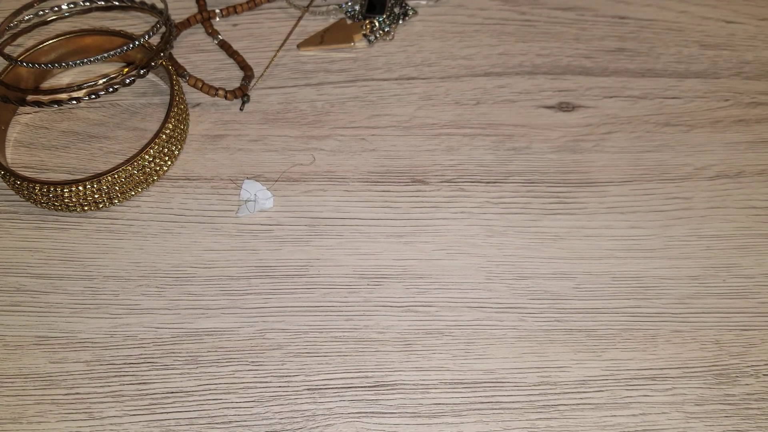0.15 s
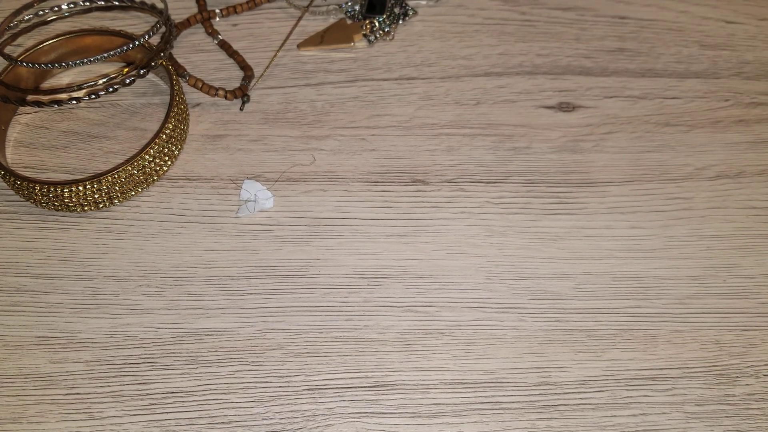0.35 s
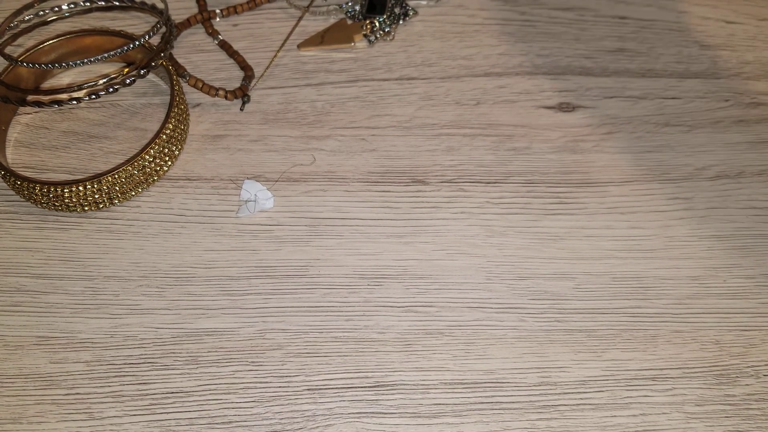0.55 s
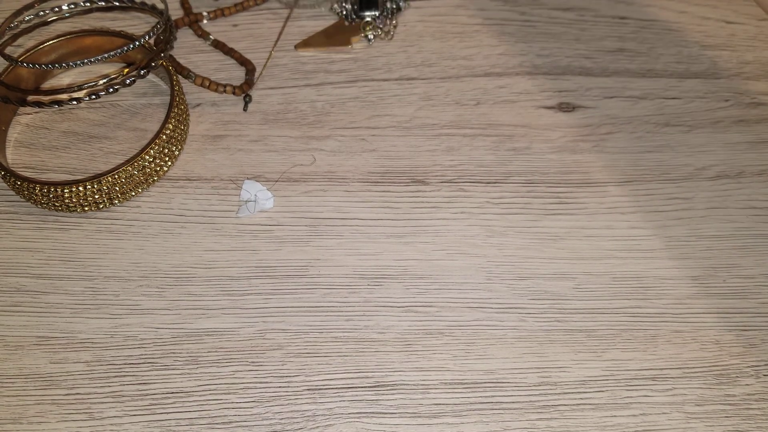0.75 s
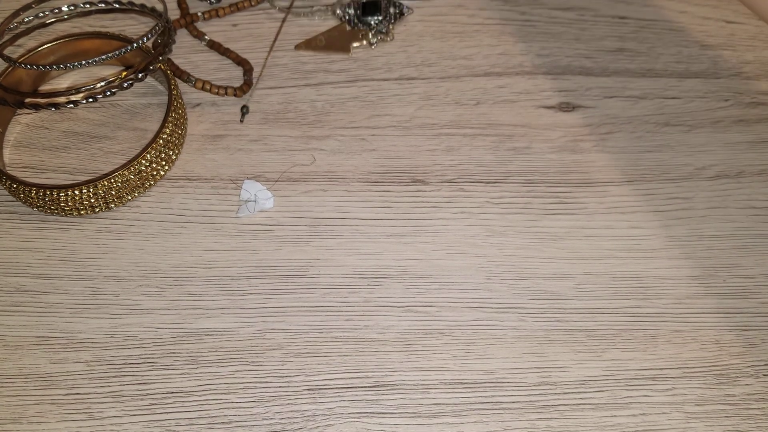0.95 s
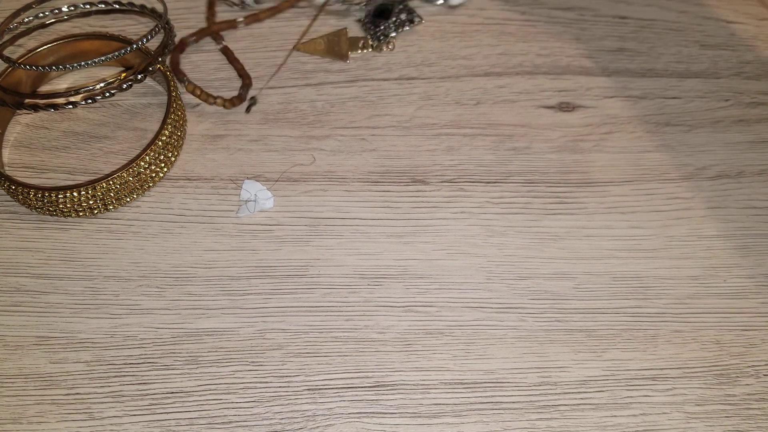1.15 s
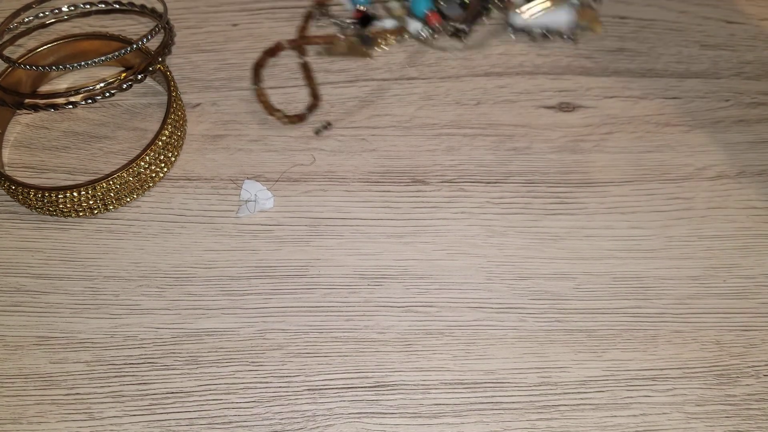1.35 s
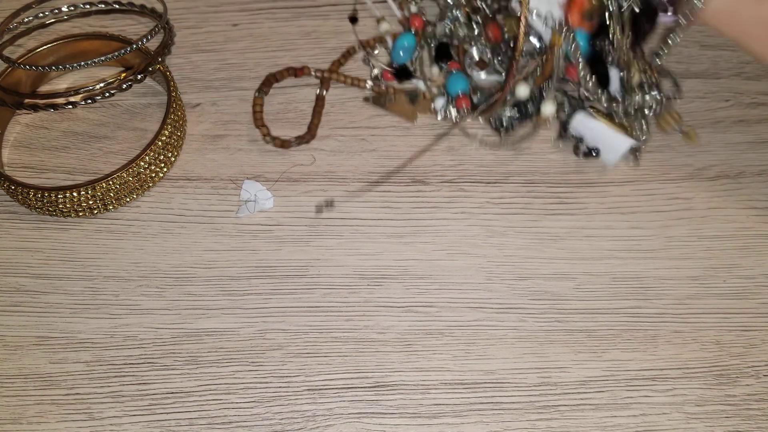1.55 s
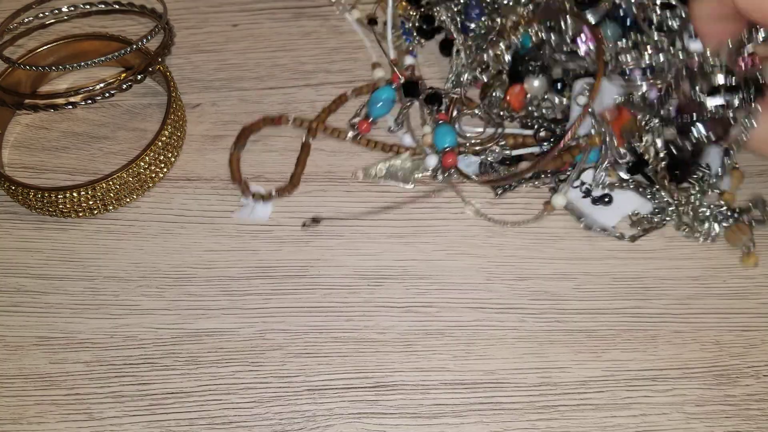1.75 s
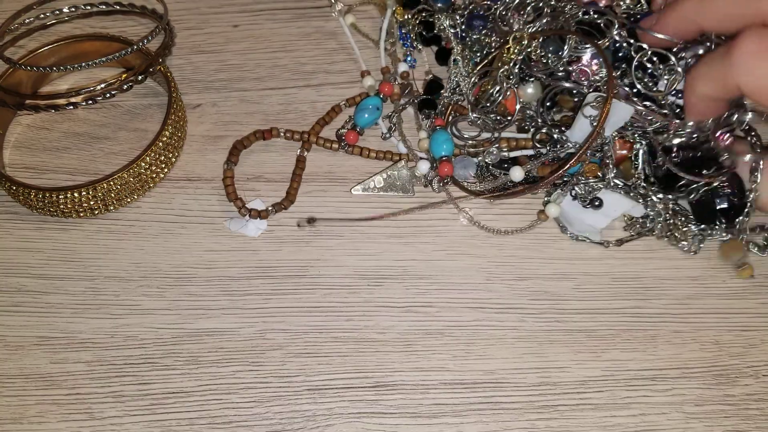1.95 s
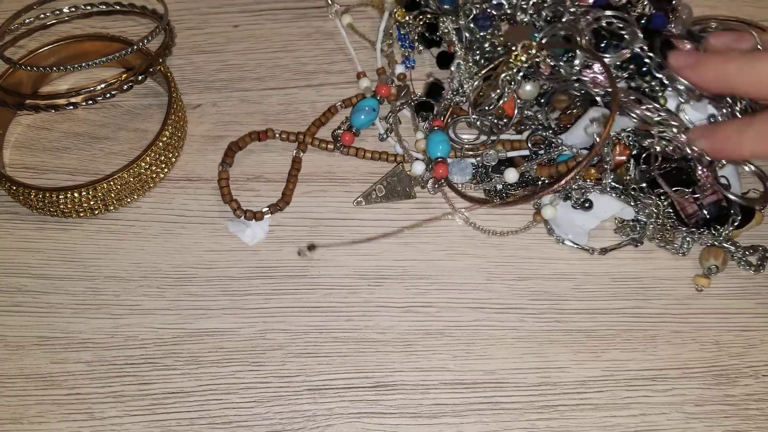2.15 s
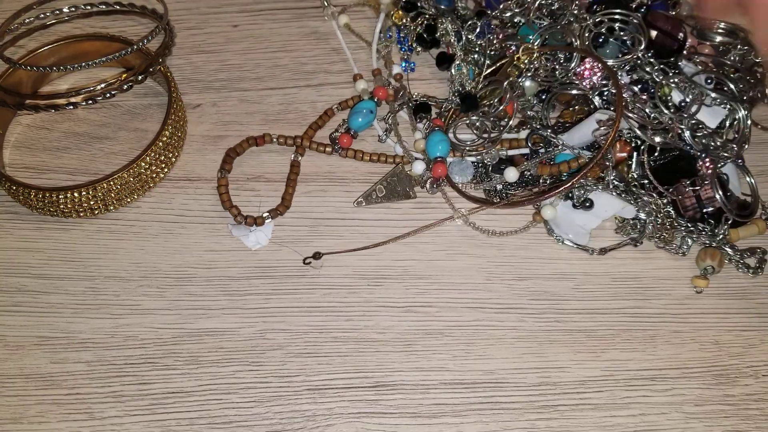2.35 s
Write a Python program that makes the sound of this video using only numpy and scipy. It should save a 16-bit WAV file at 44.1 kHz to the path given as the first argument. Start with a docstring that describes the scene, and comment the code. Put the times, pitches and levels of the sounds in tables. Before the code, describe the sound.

A tangled heap of jewelry rustles and clinks as it is pushed across a wooden table. Beads clack and chains tick, growing louder over soft bumps, then settle, close up in a small room.

```python
"""Clacking beads and ticking chain links: a tangled heap of costume jewellery is pushed across a wooden
table and let go, close up in a small room. The rustle is a swarm of tiny random contacts, thicker and
louder the harder the push, with single pieces knocking out above it. A bangle clinks and a small charm
rings briefly. Underneath, the tabletop patters, rumbles and bumps, over a faint hiss and low hum."""
import sys
import numpy as np
from scipy import signal
from scipy.fft import rfft, irfft
from scipy.io import wavfile
from scipy.ndimage import uniform_filter1d

SR = 44100
rng = np.random.default_rng(int(sys.argv[2]) if len(sys.argv) > 2 else 0)


def digitize_waveform(pressure):
    """Quantize a signal to 16-bit integers and store it at the path in sys.argv[1].

    Rows of a 2-D input are taken as channels; values are limited to [-1, 1].
    """
    field = np.atleast_2d(pressure).T
    bounded = np.clip(field, -1, 1)
    quanta = np.round(bounded * 32767).astype(np.int16)
    wavfile.write(sys.argv[1], SR, quanta)


N = 110250
TIME = np.arange(N) / SR
BUSY_DB = -38  # the level at which contacts come at their nominal rate
WOOD_DECAY_S = 0.00063
WOOD_ALIKE, BEAD_ALIKE, LINK_ALIKE = 0.92, 0.36, 0.032  # left-right likeness: 0 wide, 1 mono
WOOD_PAN_DB, BEAD_PAN_DB = [[-0.83], [0.83]], [[-0.5], [0.5]]  # left, right

# single pieces knocking: start_s, length_s, tabletop_db, clack_db, click_db, tick_db, tick_pitch_hz
KNOCKS = [(0.6128, 0.001, -61, -53, -50, -42.5, 12700), (0.6342, 0.0037, -44, -30.5, -39, -42.5, 12000),
          (0.669, .0027, -59, -53, -40, -40, 5200), (0.885, .0024, -55, -40.5, -51, -35, 12400),
          (0.9358, 0.0044, -40.5, -39, -33.5, -36, 13000), (0.978, 0.0012, -41, -50, -54, -27, 13000),
          (0.989, 0.0045, -32, -41, -55, -42, 12600), (1.047, .0035, -47, -35.5, -30, -36, 5030),
          (1.065, 0.0034, -48, -36, -32, -39, 12700), (1.226, .0014, -39, -41, -35, -25.5, 12600),
          (1.3044, 0.0013, -48, -40, -42, -24.5, 15000), (1.361, .0034, -47, -31.5, -30, -28, 14000),
          (1.4502, 0.002, -25, -24, -32, -21.5, 11300), (1.576, 0.0033, -28, -24, -24, -24, 12400),
          (1.6668, 0.0033, -27, -21, -31.5, -35, 3900), (1.676, 0.0044, -30, -28.5, -44, -41, 2400),
          (1.6932, 0.0025, -32, -27, -27.5, -24, 3700), (1.837, .002, -56, -48, -37.5, -35.5, 12000),
          (1.96, 0.003, -43.5, -36.5, -38, -38, 14000), (1.965, .003, -44, -41, -40, -34.5, 13400),
          (2.0138, 0.0071, -47, -43.5, -42, -38, 13900), (2.0712, 0.0019, -43, -42.5, -54, -41, 3800),
          (2.0857, 0.0022, -35, -43, -36.5, -38, 12500), (2.097, 0.0019, -51, -52, -44, -33.5, 13000),
          (2.1457, 0.0028, -43.5, -44.5, -45, -37, 7340), (2.158, 0.0022, -50.5, -40.5, -47.5, -43, 7800),
          (2.1838, .0018, -52, -60, -46, -36, 15400), (2.187, .0026, -46, -41, -41, -45, 13000),
          (2.1984, 0.003, -57, -39, -43, -43, 15400), (2.244, 0.0029, -43.5, -46, -47.5, -39, 14600),
          (2.354, 0.004, -70, -63, -44.5, -46.5, 11900), (2.488, 0.0053, -55, -61, -57, -46.5, 12600)]


def push_levels():
    """The push swells and settles: level curves in dB for patter, beads and links."""
    push = [(0.613, -63, -59.5, -81), (0.628, -43.5, -42, -51), (0.69, -48.5, -38.5, -46),
            (0.75, -38.5, -33, -39), (0.821, -58.5, -48, -45), (0.909, -59.5, -47.5, -46.5),
            (0.959, -44, -39, -44), (1.02, -46, -37, -38), (1.06, -40.5, -34, -33.5),
            (1.11, -44, -35.5, -41), (1.21, -42, -33.5, -33.5), (1.32, -42, -34, -35.5),
            (1.38, -32, -28.5, -33), (1.46, -30.5, -25, -31.5), (1.53, -34.5, -28, -32.5),
            (1.61, -29.5, -29, -34.5), (1.68, -31, -30.5, -34.5), (1.761, -35, -32, -34.5),
            (1.8, -46, -41, -45), (1.89, -48.5, -43.5, -42.5), (1.96, -48, -42.5, -40.5),
            (2.02, -49.5, -42.5, -42), (2.06, -53.5, -45.5, -48.5), (2.135, -62.5, -53.5, -56.5),
            (2.16, -47.5, -48, -50.5), (2.26, -55.5, -50, -44.5), (2.33, -61, -54.5, -48),
            (2.381, -64, -59, -59), (2.43, -81, -77, -68)]  # the gesture: time_s, patter_db, beads_db, links_db
    times, *layers = np.transpose(push)
    return [np.interp(TIME, times, db, left=-120) for db in layers]


def beads(level_db):
    """Beads and pendants clack against each other: a dense rustle with single hits on top."""
    rustle_tone = [(300, -15), (900, -5.5), (1500, 0), (2200, 1.5), (2900, 4.5), (3450, -4), (4050, 2),
                   (4700, 1.5), (5300, 3), (6500, -2), (8000, -1), (9200, -8), (12000, -3), (16000, -43)]  # spectrum of the massed beads: frequency_hz, level_db
    clack_tone = [(300, -8), (680, 0), (1050, 5), (1400, -2), (2000, 4), (3000, -0.5), (4200, 2),
                  (5000, -15.5), (8000, -27), (16000, -45)]  # midrange body of one hit: frequency_hz, level_db
    click_tone = [(1500, -28), (3500, -22), (5000, 5.5), (6500, -1), (8000, 2), (9200, -3.5), (12000, -22),
                  (16000, -35)]  # hard edge of one hit: frequency_hz, level_db
    swarm = contacts(level_db, per_s=1500, spread_db=-1, decay_s=0.0018, alike=BEAD_ALIKE)
    rustle = from_db(-2.5) * colour(swarm, rustle_tone)
    clacks = colour(knocks("clack", BEAD_ALIKE, decay_share=1.6), clack_tone)
    clicks = colour(knocks("click", LINK_ALIKE, decay_share=1.0), click_tone)
    return (rustle + clacks + clicks) * from_db(BEAD_PAN_DB)


def chains(level_db):
    """Fine links tick as the chains slide."""
    link_tone = [(2000, -32.5), (6000, -8), (9300, -10.5), (11200, -5.5), (12600, 0.5), (14200, -3.5),
                 (15400, -2), (17000, -11)]  # bright spectrum of the links: frequency_hz, level_db
    swarm = contacts(level_db, per_s=1500, spread_db=0.5, decay_s=0.00081, alike=LINK_ALIKE)
    return from_db(-2) * colour(swarm, link_tone)


def tinkles(level_db, per_s=380, low_hz=1509, high_hz=7985, t60_s=0.046):
    """Small metal parts ring for a moment, each at its own pitch, louder as the heap moves harder."""
    out, t = np.zeros((2, N)), TIME[:4096]
    decay = np.exp(-np.log(1000) * t / t60_s)
    for when, pitch, size, *phases in rng.random((int(per_s * N / SR), 5)):
        hz = low_hz * (high_hz / low_hz) ** pitch
        strength = from_db(level_db[int(when * N)] - 13 + 13 * (size - 0.5))
        tone = np.sin(2 * np.pi * (hz * t + np.array(phases)[:, None]))
        add(out, when * N / SR, strength * decay * tone)
    return out


def bright_ticks(width_hz=2000):
    """Each piece that knocks gives a bright tick around a pitch of its own."""
    out = np.zeros((2, N))
    for start_s, length_s, *_, db, hz in KNOCKS:
        resonance = signal.iirpeak(hz, hz / width_hz, fs=SR)
        tick = signal.lfilter(*resonance, burst(length_s, LINK_ALIKE))
        add(out, start_s, from_db(db) * np.sqrt(length_s * SR) * energy_one(tick))
    return out


def bangle():
    """A struck bangle clinks with a few short, inharmonic modes."""
    hits = [(.6365, -35.5), (.9365, -39), (1.049, -40), (2.3545, -55.5)]  # strikes on the bangle: start_s, level_db
    modes = [(670, -1, 0.074), (1050, -10, .05), (2850, 3.5, 0.072), (3116, 4.5, 0.053), (3530, -15, 0.078),
             (4150, -1, 0.066), (4255, -2, 0.042), (5148, -22, 0.052)]  # its resonances: pitch_hz, level_db, t60_s
    return metal(hits, modes)


def charm():
    """A tiny charm rings very high; its close modes beat into a shimmer."""
    hits = [(.9935, -32), (1.14, -38), (1.226, -41), (1.272, -38), (1.33, -37), (1.40, -43), (1.46, -33),
            (1.56, -35)]  # strikes on the charm: start_s, level_db
    modes = [(12340, -7, .14), (12505, -1.5, .15), (12645, -1.5, .15)]  # its resonances: pitch_hz, level_db, t60_s
    return metal(hits, modes)


def metal(hits, modes):
    """A metal piece rings; each hit reaches each mode and side with its own strength and phase."""
    out, t = np.zeros((2, N)), TIME[:SR // 4]
    hz, mode_db, t60_s = np.transpose(modes)[:, :, None]
    decay = np.exp(-np.log(1000) * t / t60_s)
    for start_s, db in hits:
        strength = from_db(db + mode_db + 2 * rng.standard_normal((2, len(modes), 1)))
        phase = rng.uniform(0, 2 * np.pi, strength.shape)
        add(out, start_s, np.sum(strength * decay * np.sin(2 * np.pi * hz * t + phase), axis=1))
    return out


def contacts(level_db, per_s, spread_db, decay_s, alike, pieces=14):
    """Random contacts dealt to many pieces; the higher the level, the denser and louder they come."""
    rate_per_s = per_s * from_db(0.6 * (level_db - BUSY_DB))
    struck = rng.random(N) < rate_per_s / SR
    sizes = from_db(spread_db * np.minimum(rng.exponential(1, N), 4))
    clicks = struck * sizes * rng.choice([-1, 1], N)
    local_rms = np.sqrt(np.abs(uniform_filter1d(clicks ** 2, size=1300)) + 1e-4)
    clicks = clicks / local_rms * from_db(level_db)
    owner = rng.integers(0, pieces, N)
    return sum(signal.oaconvolve((clicks * (owner == k))[None], burst(decay_s, alike), axes=1)[:, :N]
               for k in range(pieces))


def knocks(layer, alike, decay_share):
    """One layer of the single knocks: sharp bursts that die within milliseconds."""
    out = np.zeros((2, N))
    column = ("tabletop", "clack", "click").index(layer)
    for start_s, length_s, *levels_db in KNOCKS:
        strength = from_db(levels_db[column]) * np.sqrt(length_s * SR)
        add(out, start_s, strength * burst(length_s * decay_share, alike))
    return out


def tabletop(level_db):
    """The sliding heap drums evenly on the board; single knocks stand out above it."""
    patter = board(contacts(BUSY_DB, per_s=600, spread_db=2, decay_s=WOOD_DECAY_S, alike=WOOD_ALIKE))
    local_rms = np.sqrt(uniform_filter1d(np.mean(patter ** 2, axis=0), size=1100) + 1e-9)
    hits = board(knocks("tabletop", WOOD_ALIKE, decay_share=0.56))
    return (from_db(level_db) * patter / local_rms + hits) * from_db(WOOD_PAN_DB)


def board(force):
    """The board answers with a dull knock and its own modes."""
    wood_tone = [(40, -12), (100, -12), (200, -4.5), (290, 6), (400, 5.5), (520, 6.5), (720, -1.5),
                 (950, -7), (1400, -13), (2500, -19.5), (6000, -45.5)]  # spectrum of the dull knock: frequency_hz, level_db
    modes = [(281, -3, 0.19), (350, -2.5, .05), (410.2, 6.5, 0.061), (546.4, 8, 0.14), (614, -0.5, 0.14),
             (720.3, 12.5, 0.07), (802, 1, 0.046), (967, -4, 0.091), (1088, -6, 0.048)]  # tabletop resonances: pitch_hz, level_db, t60_s
    ringing = sum((-1) ** k * from_db(db) * ring(force, hz, t60_s)
                  for k, (hz, db, t60_s) in enumerate(modes))
    return colour(force, wood_tone) + from_db(-3.5) * rms_one(ringing) * force.std()


def bumps(rise_s=0.0054):
    """Soft, heavy contacts of hand and heap rock the whole table for a few cycles."""
    thumps = [(.545, 109, -52.5), (0.621, 130, -35), (0.934, 139, -36.5), (.992, 170, -43),
              (1.111, 165, -37.5), (1.147, 209, -38.5), (1.181, 146, -39.5), (1.394, 80, -41),
              (1.463, 70, -36), (2.204, 240, -46.5)]  # low bumps on the table: start_s, pitch_hz, peak_db
    out, t = np.zeros((2, N)), TIME[:8192]
    swell = t / rise_s * np.exp(1 - t / rise_s)
    for start_s, hz, db in thumps:
        add(out, start_s, from_db(db) * swell * np.sin(2 * np.pi * hz * t))
    return out * from_db(WOOD_PAN_DB)


def rubbing():
    """Hand and heap drag over the wood with an uneven low rumble."""
    swell = [(0, -79), (.25, -80.5), (.48, -76), (.6, -65.5), (.66, -55), (.86, -62), (.92, -55),
             (1.06, -52.5), (1.13, -44.5), (1.28, -49.5), (1.36, -44), (1.6, -49), (1.8, -55),
             (2.22, -56.5), (2.43, -76.5)]  # rise and fall of the rubbing: time_s, level_db
    rumble_tone = [(30, -24), (65, -1), (100, -6), (132, 3.5), (160, 0.5), (200, -2.5), (270, -3.5),
                   (380, -13.5), (700, -26.5), (2000, -49)]  # its bass-heavy spectrum: frequency_hz, level_db
    level_db = np.interp(TIME, *np.transpose(swell))
    grain = contacts(BUSY_DB, per_s=500, spread_db=5.3, decay_s=WOOD_DECAY_S, alike=1.0, pieces=4)
    return from_db(level_db) * rms_one(colour(grain, rumble_tone)) * from_db(WOOD_PAN_DB)


def room(x, t60_s=0.083, wet_db=-13):
    """The small room returns a short, diffuse tail after 4 ms."""
    tail = burst(t60_s / np.log(1000), alike=0, count=16384)
    tail = np.pad(tail, ((0, 0), (SR // 250, 0)))
    return from_db(wet_db) * signal.oaconvolve(x, tail, axes=1)[:, :N]


def background(hum_hz=44.5, floor_db=-67.5):
    """Room tone: quiet rumble and hiss, with a low hum that dips briefly near the start."""
    floor_tone = [(25, -12.5), (60, -1), (110, -4), (200, -26.5), (400, -26), (1000, -31.5), (3000, -35),
                  (6500, -35.5), (9000, -42), (12000, -29), (16000, -30.5)]  # spectrum of rumble and hiss: frequency_hz, level_db
    hum_curve = [(0, -55), (.1, -69), (.27, -72), (.38, -56.5), (1.2, -57), (2.5, -57)]  # loudness of the hum: time_s, level_db
    hum_db = np.interp(TIME, *np.transpose(hum_curve))
    hum = from_db(hum_db) * np.sqrt(2) * np.sin(2 * np.pi * hum_hz * TIME)
    noise = from_db(floor_db) * colour(stereo_noise(N, alike=0.11), floor_tone)
    return noise + hum * from_db([[-2.5], [0.8]])


def burst(decay_s, alike, count=2048):
    """Crowded, quickly dying modes, played as decaying noise of unit energy."""
    return energy_one(stereo_noise(count, alike) * np.exp(-TIME[:count] / decay_s))


def stereo_noise(count, alike):
    """Left and right noise with the given likeness."""
    mid, side = rng.standard_normal((2, count))
    return np.sqrt((1 + alike) / 2) * mid + np.sqrt((1 - alike) / 2) * side * np.array([[1], [-1]])


def ring(x, hz, t60_s):
    """One mode: every click sets a dying sine ringing."""
    radius, angle = from_db(-60 / (t60_s * SR)), 2 * np.pi * hz / SR
    return signal.lfilter([0, np.sin(angle)], [1, -2 * radius * np.cos(angle), radius ** 2], x + 1e-18)


def colour(x, tone):
    """EQ with the given spectrum; white noise keeps its power."""
    size = 2 ** 18
    hz, db = np.transpose(tone)
    bins_hz = np.arange(size // 2 + 1) * SR / size
    gain = rms_one(from_db(np.interp(np.log(bins_hz + 1), np.log(hz), db)))
    cepstrum = irfft(np.log(gain))
    cepstrum[1:size // 2] *= 2  # fold to minimum phase, so attacks stay sharp
    cepstrum[size // 2 + 1:] = 0
    return irfft(rfft(x, size) * np.exp(rfft(cepstrum)))[..., :N]


def add(out, start_s, x):
    """Mix x in at start_s."""
    i = int(np.clip(start_s * SR, 0, N - 1))
    out[..., i:i + x.shape[-1]] += x[..., :N - i]


def from_db(db):
    return 10 ** (np.asarray(db) / 20)


def rms_one(x):
    return x / np.sqrt(np.mean(x ** 2) + 1e-20)


def energy_one(stereo):
    return stereo / np.sqrt(np.sum(stereo ** 2) / 2)


def scene(left_lag_s=0.0003):
    """The heap lies a little to the right, so the left side hears it later; the wood has no such lag."""
    patter_db, beads_db, links_db = push_levels()
    clatter = beads(beads_db) + tinkles(beads_db) + chains(links_db) + bright_ticks()
    left, right = clatter + bangle() + charm()
    late_left = np.pad(left, (int(left_lag_s * SR), 0))[:N]
    near = np.array([late_left, right]) + tabletop(patter_db) + rubbing() + bumps()
    return near + room(near) + background()


def record(dry, low_cut_hz=34, high_cut_hz=15800):
    """The deepest bass is rolled off and the very top is cut steeply."""
    dry = signal.sosfilt(signal.butter(4, low_cut_hz, "high", fs=SR, output="sos"), dry)
    return signal.sosfilt(signal.ellip(12, 0.2, 80, high_cut_hz, fs=SR, output="sos"), dry)


dry = scene()
out = record(dry)
digitize_waveform(out)
```